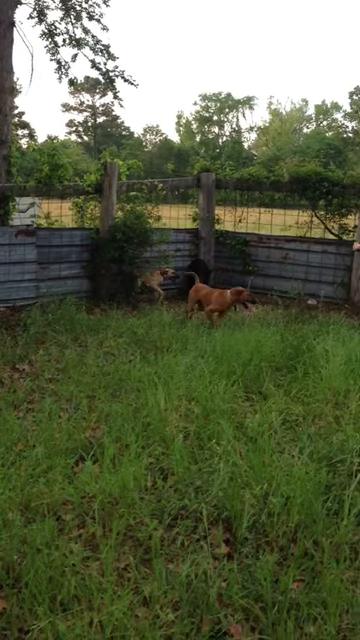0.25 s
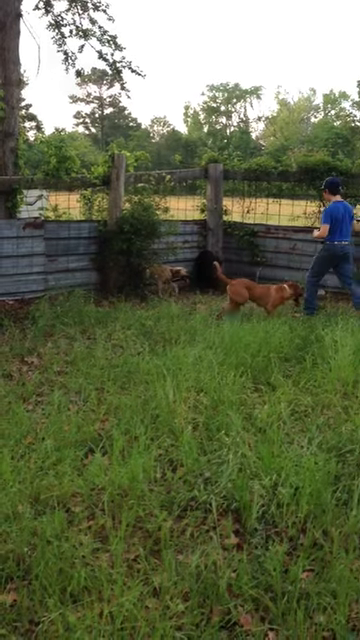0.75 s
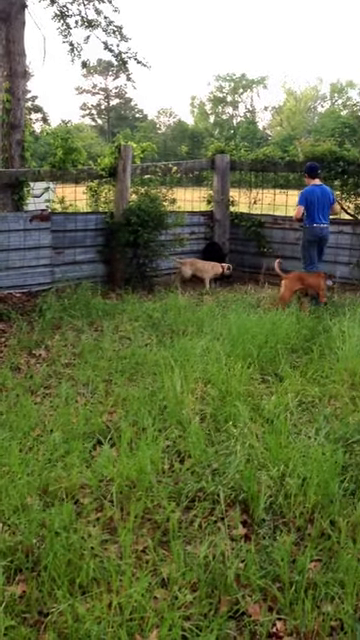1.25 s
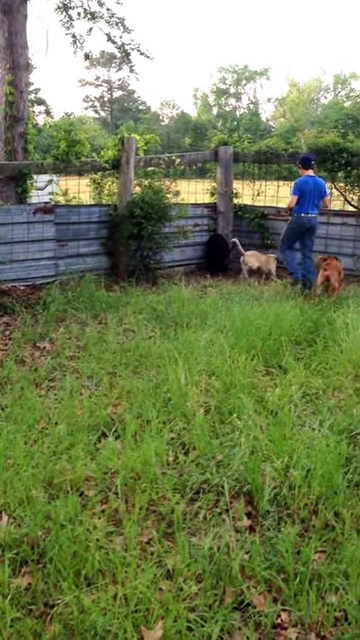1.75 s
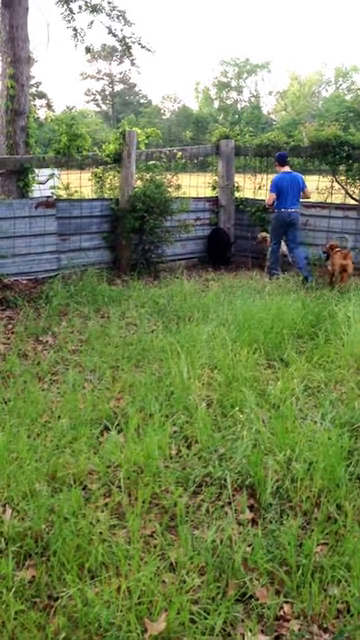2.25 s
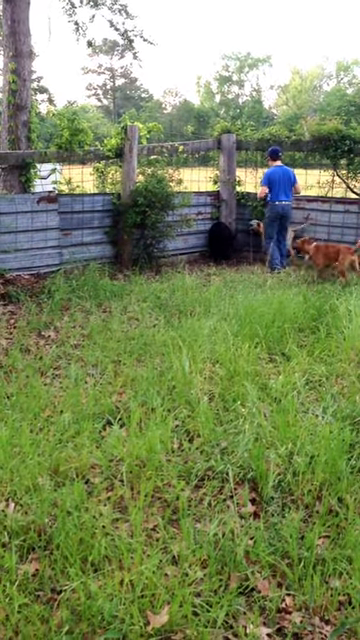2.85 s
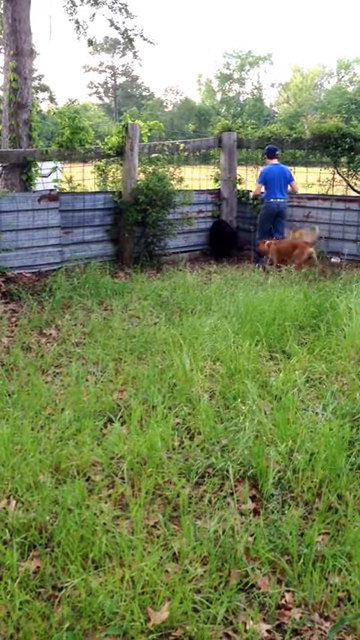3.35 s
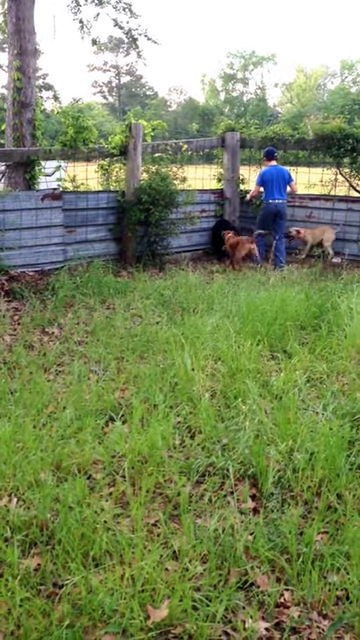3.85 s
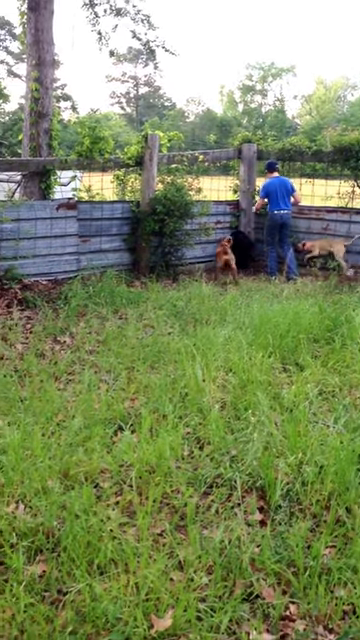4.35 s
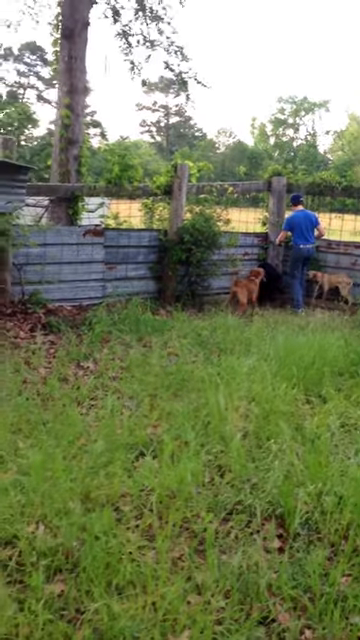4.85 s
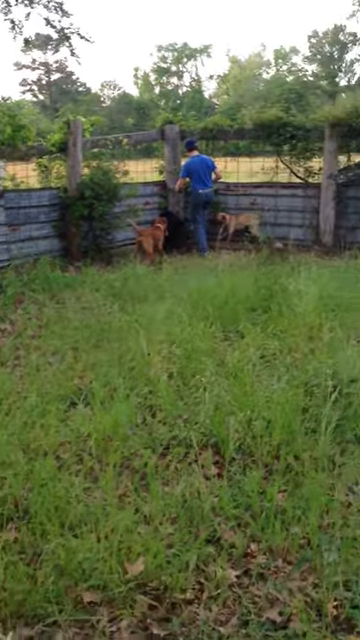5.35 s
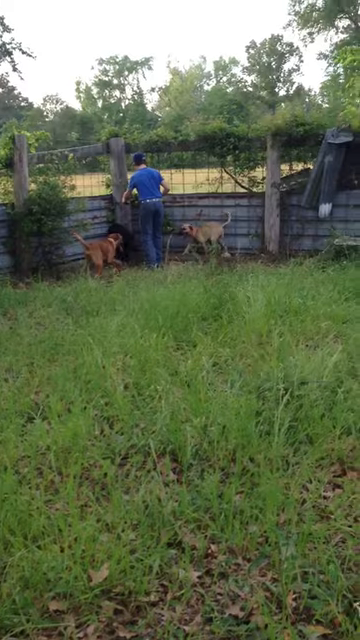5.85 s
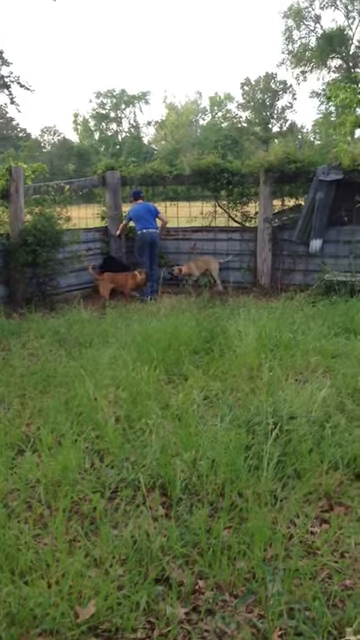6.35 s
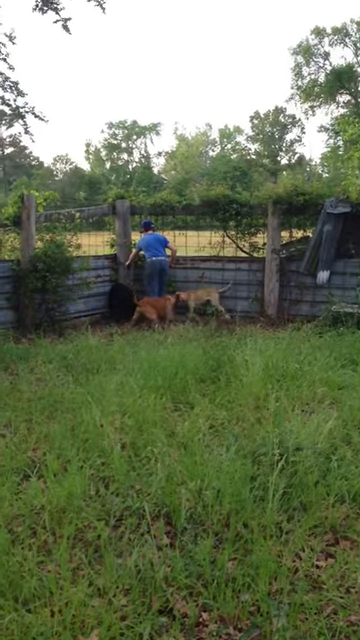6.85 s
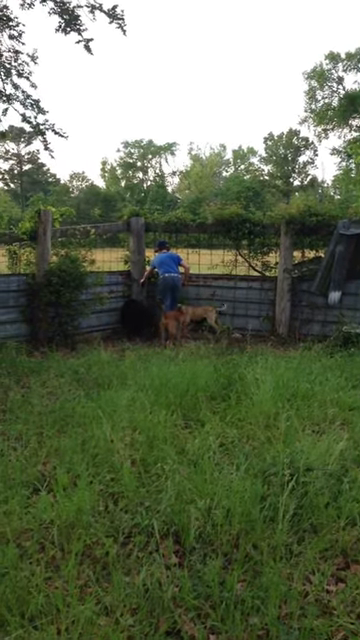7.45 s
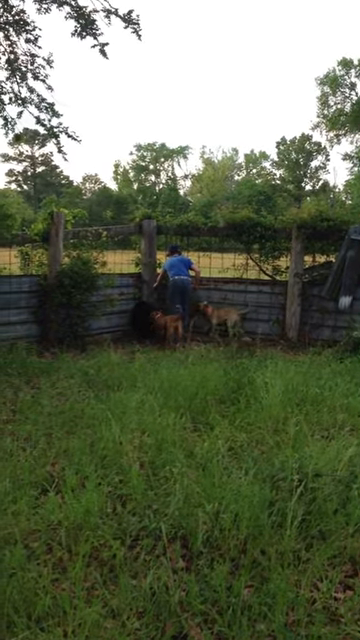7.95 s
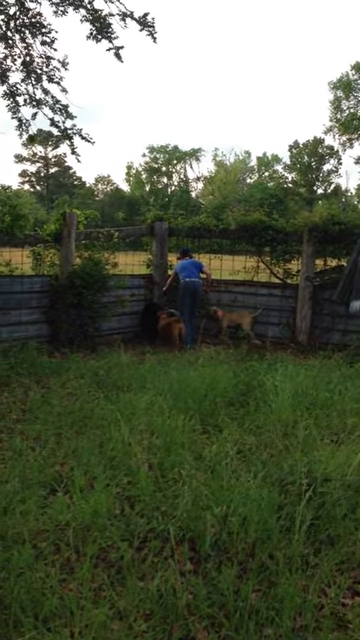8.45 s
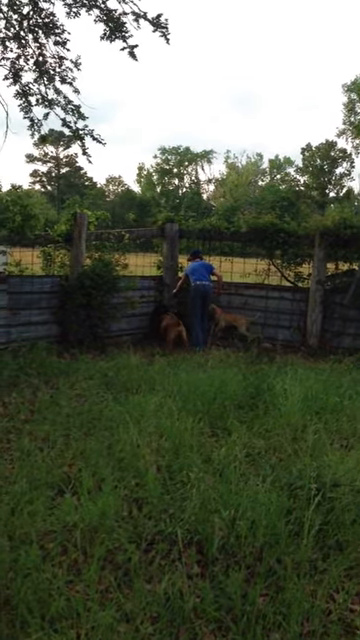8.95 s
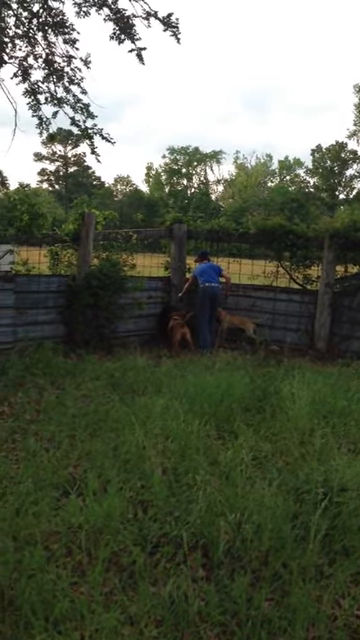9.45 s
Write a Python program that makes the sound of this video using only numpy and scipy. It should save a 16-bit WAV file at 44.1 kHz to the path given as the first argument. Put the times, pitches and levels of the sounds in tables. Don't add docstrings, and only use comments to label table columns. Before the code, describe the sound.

Two medium-sized dogs bay at a hog in a grassy pen, heard some metres off on a phone microphone. One gives mid-pitched barks that rise and drop; the other whistles a split-second yelp before a louder, gritty rasp. Low muffled grunts and dry leaf scuffs fill the earlier gaps. Later, distant dogs hoot, a tag clinks, a bird chips and a faint motor hums as barking continues.

```python
import sys
import numpy as np
from scipy import signal
from scipy.fft import rfft, irfft, next_fast_len
from scipy.io import wavfile
from scipy.ndimage import uniform_filter1d

SR = 44100
rng = np.random.default_rng(int(sys.argv[2]) if len(sys.argv) > 2 else 0)


def wav_record(signal):
    frames = np.transpose(np.atleast_2d(signal))
    bounded = np.clip(frames, -1, 1)
    quanta = np.round(bounded * 32767).astype(np.int16)
    wavfile.write(sys.argv[1], SR, quanta)


def attenuation_scalar(level_db):
    decades = np.asarray(level_db, float) / 20
    return 10 ** decades


N = 427769
TIME = np.arange(N) / SR
SHORT = TIME[:SR // 4]
ALONG = np.linspace(0, 1, 25)


def shape(hz, table):
    points = np.array(table, float)
    return np.interp(np.log(np.maximum(hz, 1)), np.log(points[:, 0]), points[:, 1])


def unit(x):
    return x / np.sqrt(np.mean(np.abs(x) ** 2))


def coloured(size, table):
    whole = next_fast_len(size)
    hz = np.fft.rfftfreq(whole, 1 / SR)
    spectrum = rfft(rng.standard_normal(whole)) * attenuation_scalar(shape(hz, table))
    return unit(irfft(spectrum, whole)[:size])


def wander(size, rate):
    k = max(int(SR / rate), 1)
    noise = rng.standard_normal(size + 2 * k)
    smooth = uniform_filter1d(uniform_filter1d(noise, k), k)
    return smooth[k:k + size] * np.sqrt(2.16 * k)


def add(track, s, sound):
    i = int(s * SR)
    track[i:i + len(sound)] += sound[:len(track) - i]


def curves(rows, edge_s):
    s, *columns = np.transpose(rows)
    t = np.arange(s[0], s[-1], 1 / SR)
    ends = np.clip(np.minimum(t - s[0], s[-1] - t) / edge_s, 0, 1)
    return [np.interp(t, s, c) for c in columns], ends


def attack(length, attack_s, attack_db):
    return attack_db * np.clip(1 - ALONG * length / attack_s, 0, 1)


# (frequency [Hz], level [dB])
BREATH_SPECTRUM = [(2900, -40), (3300, -18.5), (3800, -16), (5000, -8.5), (6660, -9), (7850, -20),
                   (13200, -26.5), (15500, -30.5)]


def hiss(size):
    whole = next_fast_len(size)
    hz = np.fft.rfftfreq(whole, 1 / SR)
    air = rfft(coloured(whole, BREATH_SPECTRUM))
    edges_hz = [0, 3700, 4500, 5400, 6500, 8000, SR]
    out = np.zeros(size)
    for low, high in zip(edges_hz, edges_hz[1:]):
        band = irfft(air * (hz >= low) * (hz < high), whole)[:size]
        out += band * attenuation_scalar(3 * wander(size, 35) - 2)
    return out


def bark(rows, throat, shut_hz, rough, half, chest_db, step, chaos_hz, breath_db):
    (hz, db, opening), ends = curves(np.array(rows) ** [1, 6, 1, 1], .006)
    size = len(hz)
    hz = uniform_filter1d(hz ** (1 / 6), SR // 80, mode="nearest")
    jitter = .008 + .05 * rough
    phase = 2 * np.pi * np.cumsum(hz * (1 + jitter * wander(size, 60))) / SR
    weak_db = db.max() - db
    closing_db = (.8 - .9 * rough) * weak_db * (np.arange(size) > db.argmax())
    mouth_hz = shut_hz * 2 ** (1.75 * opening)
    patchy_db = 2.5 + 3 * rough
    voice, power = 0, 0
    for k in np.arange(1, 3600 // hz.min(), step):
        if k == 1:
            gain = attenuation_scalar(chest_db + 6.9 * rough * wander(size, 40))
        else:
            mouth_db = 9 / (1 + ((k * hz - mouth_hz) / 190) ** 2)
            gain = attenuation_scalar(shape(k * hz, throat) + mouth_db - closing_db + patchy_db * wander(size, 30))
            gain = gain * (k * hz < 3700)
            if k % 1:
                gain = gain * half
        unsteady = np.where(closing_db > 0, .012, .03) * weak_db * (k > 1)
        share = np.clip(rough * (.6 + .12 * k ** 2) + unsteady, 0, 1)
        rate = chaos_hz * (1 + .3 * k)
        chaos = (wander(size, rate) + 1j * wander(size, rate)) / np.sqrt(2)
        drive = np.sqrt(1 - share) + np.sqrt(share) * chaos
        voice = voice + gain * np.imag(drive * np.exp(1j * k * phase))
        power = power + gain ** 2 / 2
    puffs = 1 + 0.27 * np.sin(phase)
    breath = attenuation_scalar(breath_db + 0.17 * (db + 14.5) + 0.47 * wander(size, 75)) * hiss(size) * puffs
    return (voice / np.sqrt(power) + breath) * attenuation_scalar(db) * ends


def arched_rows(s, length, top_hz, db, mouth, crest, leap):
    before = np.clip(1 - ALONG / crest, 0, 1)
    after = np.clip((ALONG - crest) / (1 - crest), 0, 1)
    hz = top_hz * (1 - .36 * before ** leap - .45 * after ** 2.2)
    level_db = db + attack(length, .024, -24.5) - 8 * before - 32.5 * after ** 1.88
    return np.transpose([s + ALONG * length, hz, level_db, mouth + .2 * np.maximum(before, after)])


# (time [s], length [s], top pitch [Hz], level [dB], mouth opening [0-1])
ARCHED_CALLS = [(1.864, .15, 497.5, -18.5, 0.22), (2.213, 0.14, 457, -15.5, 0.3),
                (2.997, .165, 469, -17, 0.18), (3.405, .156, 449.4, -19, 0.45),
                (3.749, .18, 441.4, -17.5, 0.27), (4.16, .195, 483, -15.5, 0.27),
                (4.966, .15, 448.4, -20, .15), (5.377, .16, 454.5, -19, 0.14),
                (6.402, .16, 472.2, -15.5, .3), (7.001, .17, 471, -19.5, 0.23),
                (7.401, 0.17, 462.8, -23.5, 0.31), (8.602, .165, 469.6, -20.5, 0.24),
                (8.907, .165, 402, -19.5, 0.23), (9.039, .145, 449.7, -19.5, 0.09),
                (9.447, .17, 453.4, -17, 0.27), (1.021, .21, 453.6, -30.5, 0.27),
                (4.589, 0.16, 439.6, -25.5, 0.22)]
CALL_CREST = [.57, .6, .63, .6, .48, .68, .5, .55, .55, .6, .57, .57, .58, .55, .52, .55, .5]
CALL_LEAP = [1.3, 3, 1.4, 1.5, 3, 1.8, 3, 3, 2.5, 2.4, 2.6, 3, 3.5, 3, 3.2, 1.3, 2]
CALL_ROUGH = [.12, .03, .08, .08, .42, .15, .25, .06, .1, .08, .06, .04, .06, .04, .06, .3, .1]
CALL_HALF = [0.38, 0.11, .12, .1, 0.58, 0.2, 0.38, 0.12, 0.057, 0.14, 0.21, 0.02, 0.15, 0.072, 0.18, 0.38,
             0.21]
CALL_CHEST = [-4, -10.5, -9.5, -12, 0.5, -1, -10.5, -9, -1.5, -10, 2.5, -11.5, 0.5, -9.5, -10.5, -4, 1.5]
# (frequency [Hz], level [dB])
TUNEFUL_THROAT = [(550, 9.5), (900, -0.5), (1350, -1.5), (1810, -4), (2360, -6.5), (2750, -28.5),
                  (3050, -32), (3600, -51.5)]


def arched_barks(out):
    settings = zip(ARCHED_CALLS, CALL_CREST, CALL_LEAP, CALL_ROUGH, CALL_HALF, CALL_CHEST)
    for call, crest, leap, rough, half, chest_db in settings:
        rows = arched_rows(*call, crest, leap)
        add(out, call[0], bark(rows, TUNEFUL_THROAT, 836, rough, half, chest_db,
                               step=.5, chaos_hz=151, breath_db=-29))


def harsh_rows(s, length, from_hz, to_hz, db, mouth):
    hz = from_hz + (to_hz - from_hz) * ALONG ** 1.6
    level_db = db + attack(length, .016, -8) - 27.5 * ALONG ** 2.62
    jaw = mouth + .1 * wander(len(ALONG), SR / 4)
    return np.transpose([s + ALONG * length, hz, level_db, jaw])


# (time [s], length [s], first pitch [Hz], last pitch [Hz], level [dB])
RASP_CALLS = [
    (0.653, 0.14, 525.5, 519, -11.5),
    (1.141, 0.15, 512.6, 486, -10.5),
    (1.743, 0.17, 568.5, 453, -11.5),
    (2.594, 0.16, 589.5, 455.8, -8),
    (4.635, 0.13, 596.3, 487, -11.5),
    (7.202, .117, 593.6, 543.5, -9.5),
    (7.785, 0.19, 519.2, 388.4, -11.5),
    (8.253, 0.17, 497, 400, -12),
]
RASP_OPENING = [.62, 0.5, .6, .45, .65, 0.68, 0.54, 0.63]
# (frequency [Hz], level [dB])
RASP_THROAT = [(550, 5.5), (780, -2.5), (1120, -4.5), (2080, -8.5), (2700, -22), (3100, -37), (3600, -30)]


def rasps(out):
    for call, mouth in zip(RASP_CALLS, RASP_OPENING):
        rows = harsh_rows(*call, mouth)
        add(out, call[0], bark(rows, RASP_THROAT, 573, rough=.48, half=.4, chest_db=2.5,
                               step=.25, chaos_hz=115, breath_db=-30.5))


def yelp_rows(s, length, from_hz, to_hz, db, second_db, swell_db, scoop):
    hz = (from_hz + (to_hz - from_hz) * ALONG) * (1 + scoop * np.exp(-ALONG * length / .007))
    edge_db = -7 * np.abs(2 * ALONG - 1) ** 4.3
    level_db = db + swell_db * (1 - ALONG) + attack(length, .007, -23) - max(second_db, 0)
    over_db = level_db + 2.6 * edge_db
    third_db = over_db - 25 + .39 * second_db
    return np.transpose([s + ALONG * length, hz, level_db + edge_db, over_db + second_db, third_db])


def yelp(rows):
    (hz, *dbs), ends = curves(rows, 0.001)
    size = len(hz)
    phase = 2 * np.pi * np.cumsum(hz * (1 + 0.011 * wander(size, 220))) / SR
    air = attenuation_scalar(-37.5) * coloured(size, RASP_THROAT) + attenuation_scalar(-36.5) * coloured(size, BREATH_SPECTRUM)
    air = air * attenuation_scalar(np.max(dbs, axis=0))
    dbs += [dbs[1] - 33.5, dbs[1] - 31.0, dbs[1] - 39.5]
    tone = np.zeros(size)
    for k, db in enumerate(dbs):
        level = attenuation_scalar(db + 0.8 * k * wander(size, 220))
        tone += level * np.cos((k + 1) * phase + .2 * k * wander(size, 300))
    return ends * (air - np.sqrt(2) * tone)


# (time [s], length [s], first pitch [Hz], last pitch [Hz], level [dB])
YELP_CALLS = [(0.611, .039, 975.5, 1060, -6), (1.086, .047, 791, 945, -6.5),
              (1.124, .027, 1056, 1234, -7.5), (1.719, .031, 824, 829, -7.5), (2.566, .03, 803, 948, -11.5),
              (4.576, 0.033, 975, 1117, -7), (4.603, .045, 1355, 1420, -3), (7.14, .034, 1035, 1213, -6),
              (7.173, .038, 1392, 1418, -9), (7.76, .034, 817, 772, -3), (8.218, .036, 760, 922, -5.5),
              (8.257, .029, 791, 780, -4.5), (8.171, 0.057, 399, 760, -31), (1.061, 0.037, 489, 776, -34)]
SECOND_PARTIAL = [-7.5, 6, -14, -10, 8.5, 1, -32, -14, -40, -18.5, -7.5, -26, -1, 1.5]
NOTE_SWELL = [-1, -19, -0.5, -13, -5.5, -7.5, -2, 0.5, 1.5, -9, -4.5, -10.5, -14.5, -6.5]
NOTE_SCOOP = [.14, 0, 0.0058, .08, 0, 0.082, 0.00078, 0.14, 0.0041, .14, 0.014, 0.06, 0.0029, 0]


def yelps(out):
    for call, *tone in zip(YELP_CALLS, SECOND_PARTIAL, NOTE_SWELL, NOTE_SCOOP):
        add(out, call[0], yelp(yelp_rows(*call, *tone)))


def dogs():
    out = np.zeros(N)
    arched_barks(out)
    rasps(out)
    yelps(out)
    return signal.sosfilt(signal.butter(4, 175, "high", fs=SR, output="sos"), out)


def echoes(x):
    t = TIME[:3 * SR // 2]
    walls = attenuation_scalar(-38.5) * attenuation_scalar(-60 * t / .22) * (t > .006)
    trees = attenuation_scalar(-76) * attenuation_scalar(-60 * t / 1.9) * np.clip(t / .08, 0, 1)
    colour = [(150, -12.0), (600, 0), (1500, 1), (4000, 5.5), (15000, -1)]
    return signal.fftconvolve(x, coloured(len(t), colour) * (walls + trees))[:N]


# (time [s], level [dB], start pitch [Hz], end pitch [Hz], length [s])
BIRD_CHIPS = [
    (0.537, -52, 5020, 4700, 0.0625),
    (3.478, -35, 5020, 4870, 0.041),
    (4.537, -45, 4820, 4650, 0.033),
    (7.059, -33.5, 4880, 5170, 0.044),
    (7.018, -51, 4650, 4800, 0.032),
    (7.047, -43, 5570, 5220, 0.022),
    (7.093, -44, 5270, 5330, 0.032),
]


def bird_chips(out):
    for s, db, from_hz, to_hz, length in BIRD_CHIPS:
        u = np.clip(SHORT / length, 0, 1)
        phase = 2 * np.pi * np.cumsum(from_hz + (to_hz - from_hz) * u) / SR
        flutter = attenuation_scalar(5.2 * wander(len(SHORT), 150))
        add(out, s, attenuation_scalar(db) * np.sin(np.pi * u) * flutter * np.sin(phase))


# (time [s], level [dB], length [s])
LEAF_STEPS = [
    (0.539, -57, 0.12),
    (2.519, -42, 0.049),
    (2.748, -48, 0.014),
    (3.55, -45, 0.054),
    (3.972, -51.5, .05),
    (4.11, -44.5, 0.11),
    (4.463, -40.5, 0.0077),
    (4.78, -50.5, 0.15),
    (4.843, -47, 0.052),
    (5.687, -52, 0.15),
]


def leaf_steps(out):
    colour = [(150, -24.5), (1500, -5), (6000, -12.5), (15000, -27)]
    for s, db, length in LEAF_STEPS:
        crackle = coloured(len(SHORT), colour) * attenuation_scalar(2.7 * wander(len(SHORT), 400))
        press = np.clip(SHORT / (.002 + 0.11 * length), 0, 1) * np.exp(-(SHORT / length) ** 2)
        add(out, s, attenuation_scalar(db) * crackle * press)


# (time [s], level [dB])
TAG_KNOCKS = [
    (0.4997, -60),
    (0.5528, -56),
    (2.1387, -74),
    (2.1794, -55.5),
    (5.1247, -64.5),
    (6.2367, -62),
    (6.359, -49),
    (6.8703, -64),
    (9.4122, -56.5),
]
# (frequency [Hz], level [dB], 60 dB decay time [s])
TAG_RINGING = [(10280, -0.5, .25), (10820, -30.5, 0.13), (11360, -13.5, 0.15)]


def collar_tags(out):
    for s, db in TAG_KNOCKS:
        for hz, mode_db, t60 in TAG_RINGING:
            knock_db = db + mode_db - 1 + 3.3 * rng.standard_normal()
            add(out, s, attenuation_scalar(knock_db - 60 * SHORT / t60) * np.sin(2 * np.pi * hz * SHORT))


# (time [s], level [dB], length [s])
HOG_GRUNTS = [(0.535, -52, 0.13), (1.818, -46, 0.15), (2.36, -45, 0.074), (2.73, -42, 0.2),
              (2.905, -54, 0.14), (3.096, -49, 0.13), (3.421, -45, 0.197), (3.737, -45.5, 0.13),
              (4.094, -36.5, 0.19), (4.24, -49, 0.22), (4.734, -49.5, 0.18), (5.1, -51, 0.17),
              (5.888, -60, 0.078), (6.181, -55, 0.035), (6.797, -56.5, 0.033)]


def grunts():
    swell = np.zeros(N)
    for s, db, length in HOG_GRUNTS:
        add(swell, s, attenuation_scalar(db) * np.sin(np.pi * np.clip(TIME[:SR // 2] / length, 0, 1) ** 0.46))
    colour = [(70, -31.5), (150, -6.5), (200, 1.5), (280, -4.0), (450, -20.0), (900, -65.5)]
    return coloured(N, colour) * swell


# (time [s], level [dB], pitch [Hz])
DISTANT_BARKS = [
    (0.018, -59, 873),
    (0.108, -56, 870),
    (0.339, -58, 886),
    (5.819, -57, 932),
    (6.035, -59, 897),
    (6.233, -51.5, 923),
]


def far_barks(out):
    for s, db, hz in DISTANT_BARKS:
        phase = 2 * np.pi * hz * SHORT
        tone = np.sin(phase) + 0.38 * np.sin(1.5 * phase) + 0.24 * np.sin(.5 * phase)
        swell = np.sin(np.pi * np.clip(SHORT / 0.038, 0, 1))
        add(out, s, attenuation_scalar(db) * tone * attenuation_scalar(1.4 * wander(len(SHORT), 63.5)) * swell)


# (time [s], level [dB])
MOTOR_LEVEL = [(5.8, -85), (6.1, -64.5), (8.3, -72), (9.7, -69)]


def motor():
    level_db = np.interp(TIME, *np.transpose(MOTOR_LEVEL))
    return np.sin(2 * np.pi * 104 * TIME + 1.3 * wander(N, 6)) * attenuation_scalar(level_db)


# (frequency [Hz], level [dB])
AIR_SPECTRUM = [(25, -25), (90, -15), (190, -3), (400, -12), (1000, -11.5), (1900, -14), (3360, -17.5),
                (7340, -22), (8800, -18.5), (9700, -26), (15600, -28.5)]


def air_and_insects():
    return coloured(N, AIR_SPECTRUM) * attenuation_scalar(-57 + .9 * wander(N, 6))


def scene():
    voices = dogs()
    small = np.zeros(N)
    for source in (bird_chips, leaf_steps, collar_tags, far_barks):
        source(small)
    return (voices + echoes(voices) + small + grunts() + motor() + air_and_insects())[None]


def low_pass(x):
    return signal.sosfilt(signal.butter(12, 15920, fs=SR, output="sos"), x)


def record(dry):
    top = .95
    limited = dry / (1 + (np.abs(dry) / top) ** 6) ** (1 / 6)
    thin = signal.sosfilt(signal.butter(2, 70, "high", fs=SR, output="sos"), limited)
    return low_pass(thin)


dry = scene()
out = record(dry)
wav_record(out)
```